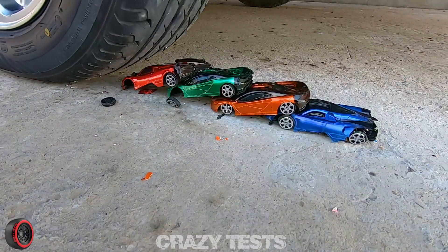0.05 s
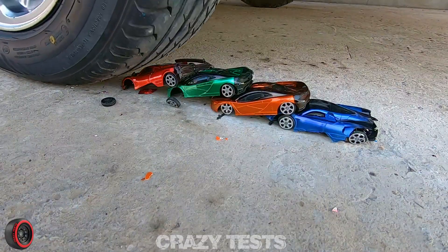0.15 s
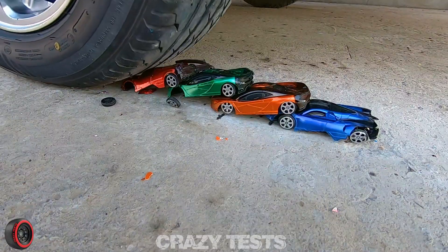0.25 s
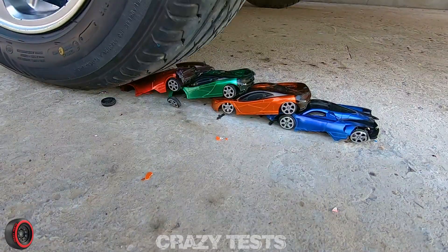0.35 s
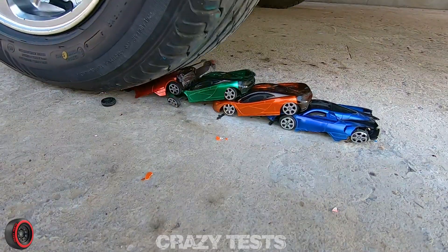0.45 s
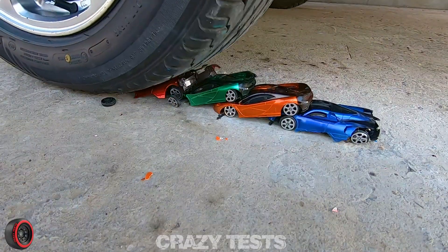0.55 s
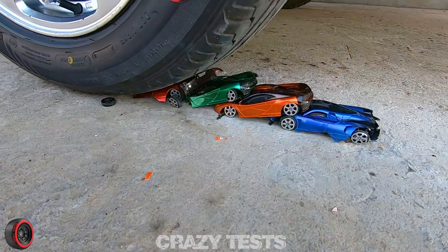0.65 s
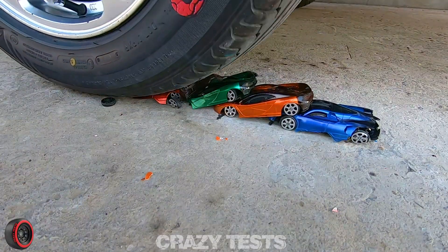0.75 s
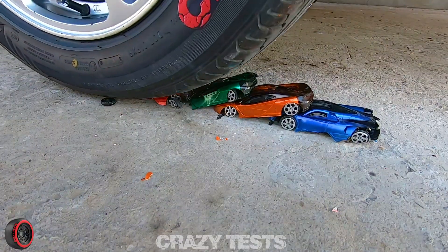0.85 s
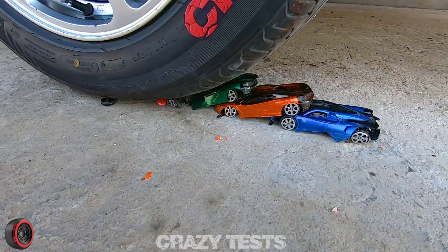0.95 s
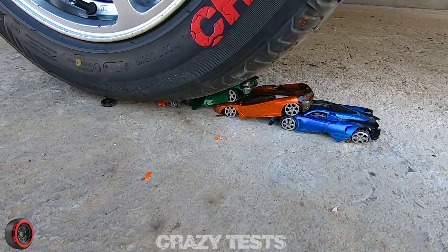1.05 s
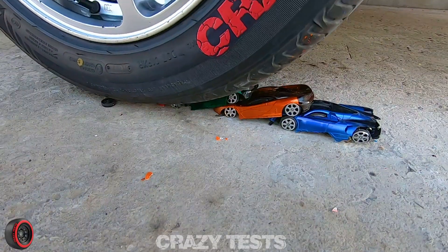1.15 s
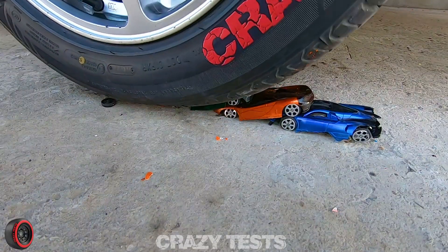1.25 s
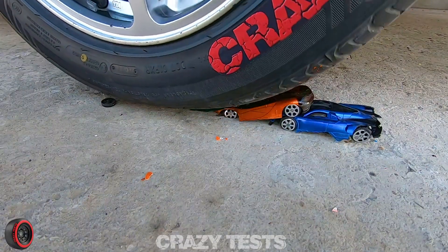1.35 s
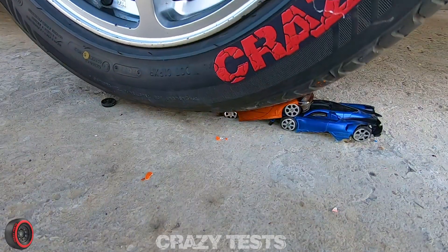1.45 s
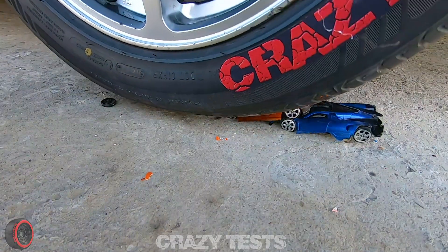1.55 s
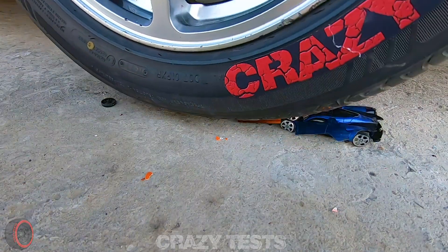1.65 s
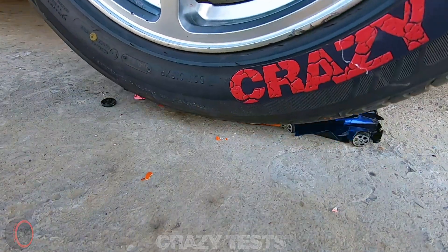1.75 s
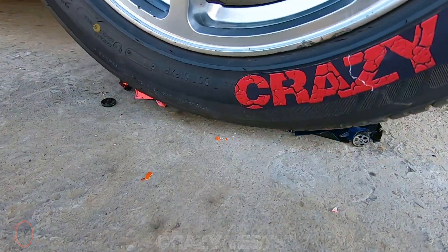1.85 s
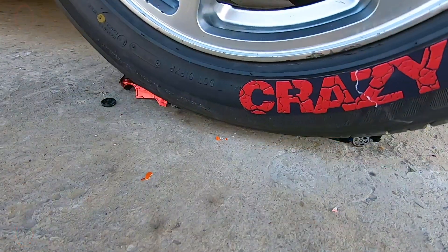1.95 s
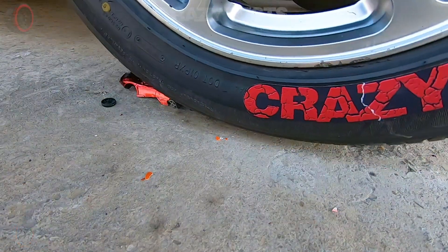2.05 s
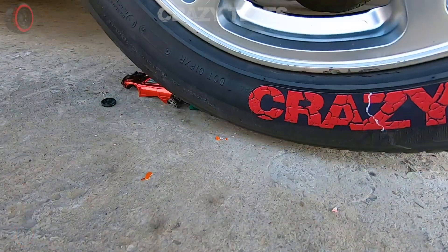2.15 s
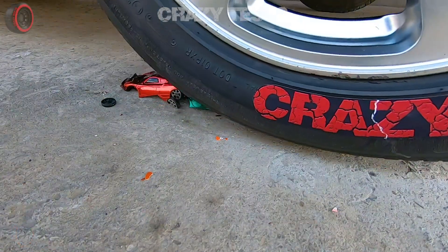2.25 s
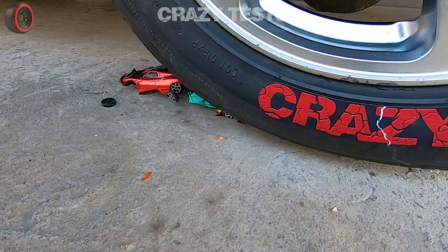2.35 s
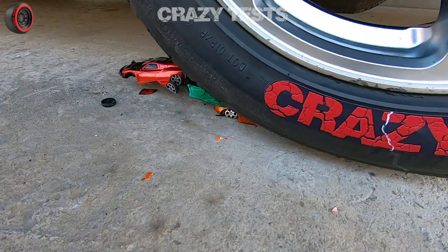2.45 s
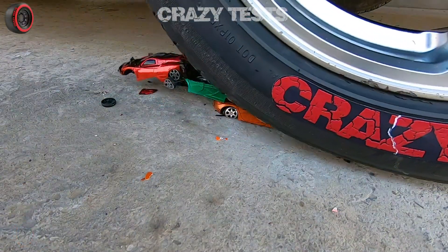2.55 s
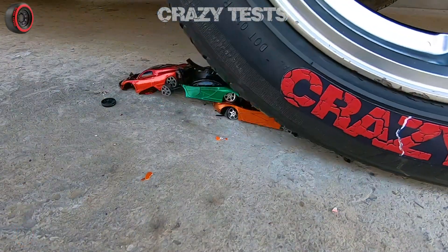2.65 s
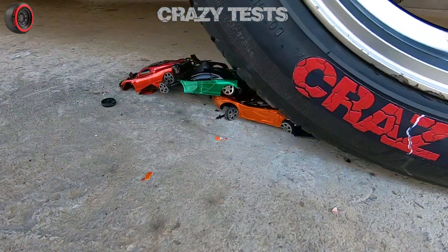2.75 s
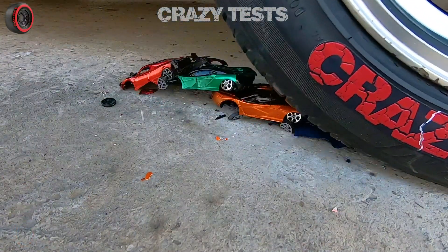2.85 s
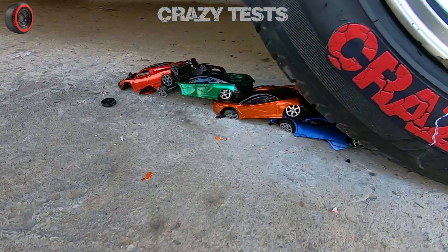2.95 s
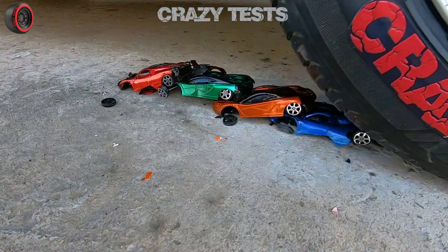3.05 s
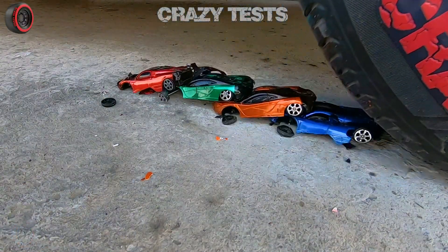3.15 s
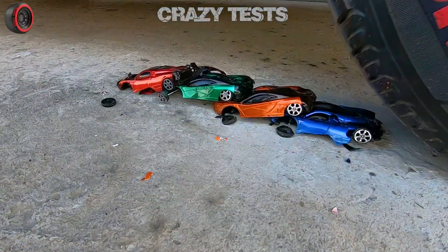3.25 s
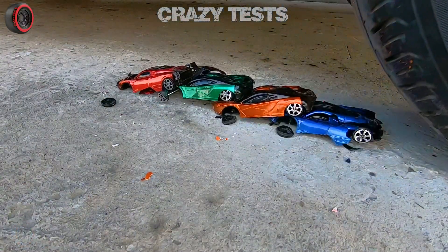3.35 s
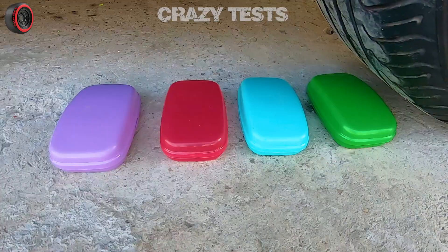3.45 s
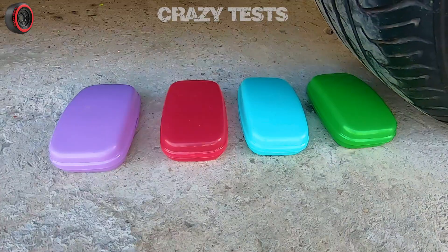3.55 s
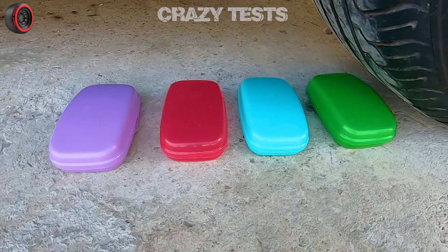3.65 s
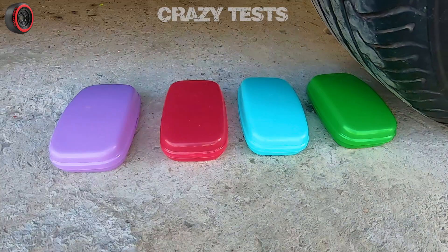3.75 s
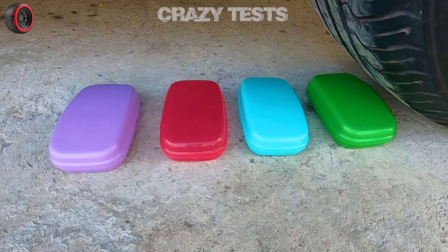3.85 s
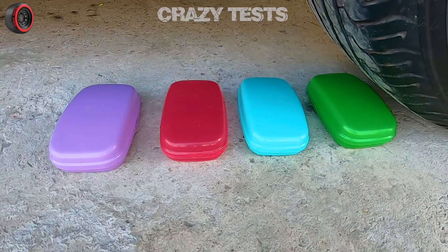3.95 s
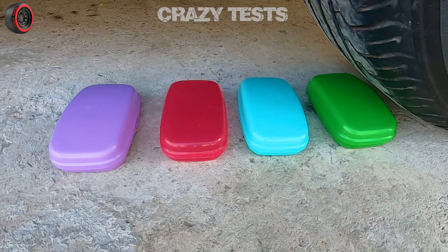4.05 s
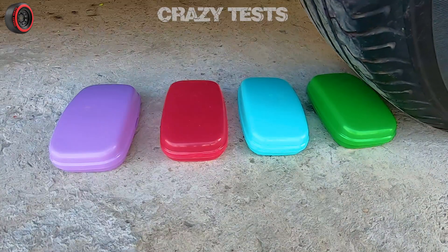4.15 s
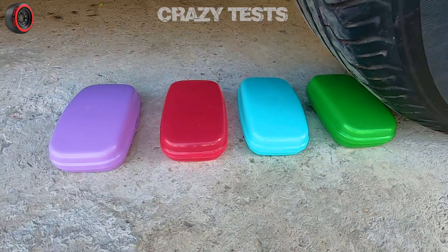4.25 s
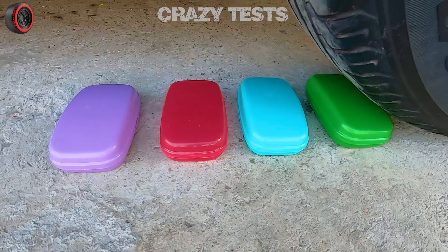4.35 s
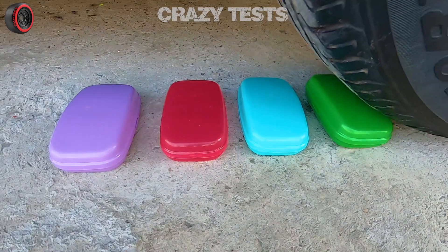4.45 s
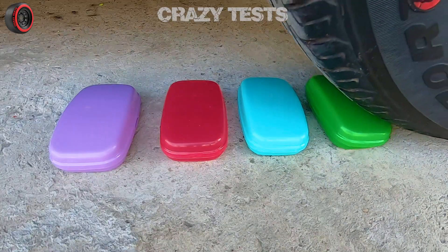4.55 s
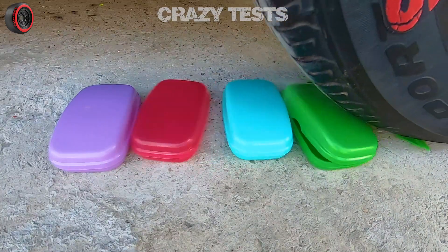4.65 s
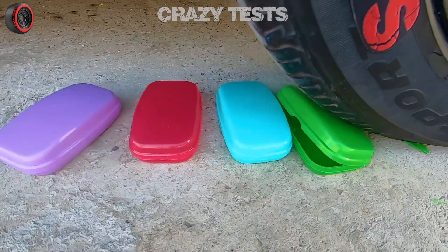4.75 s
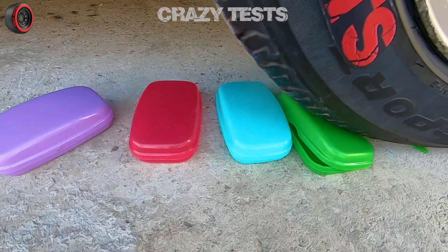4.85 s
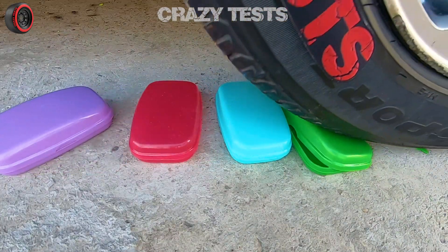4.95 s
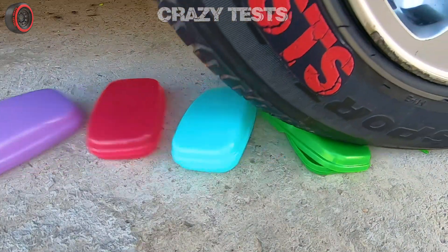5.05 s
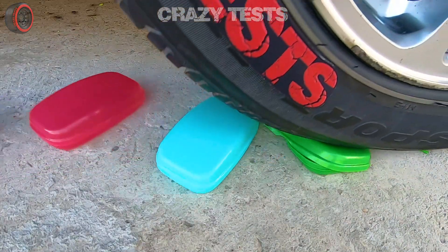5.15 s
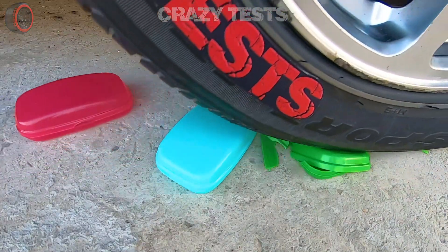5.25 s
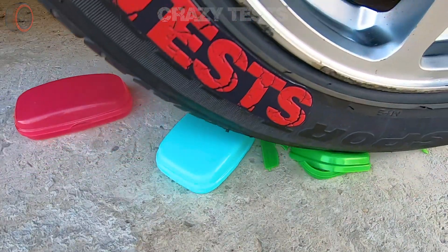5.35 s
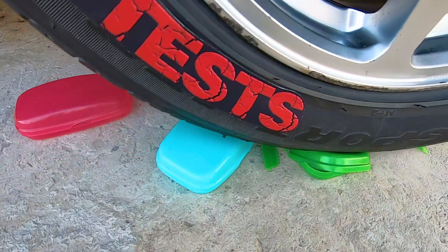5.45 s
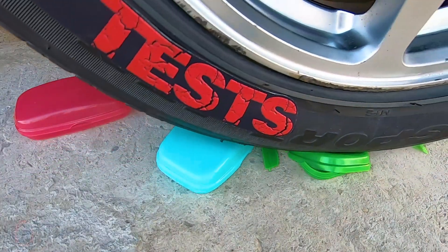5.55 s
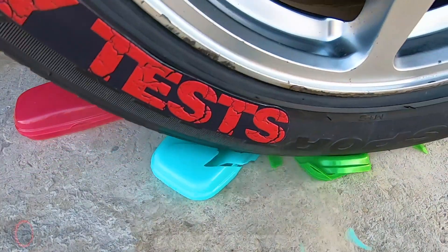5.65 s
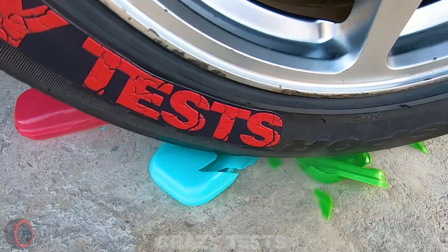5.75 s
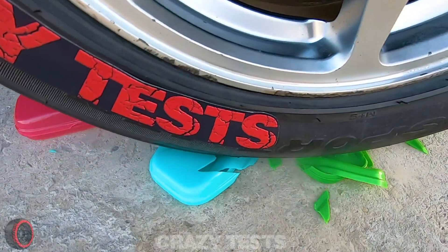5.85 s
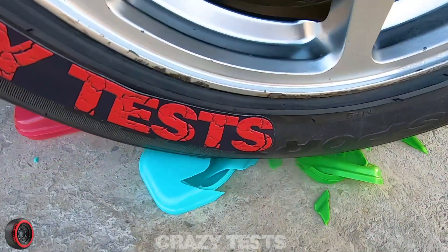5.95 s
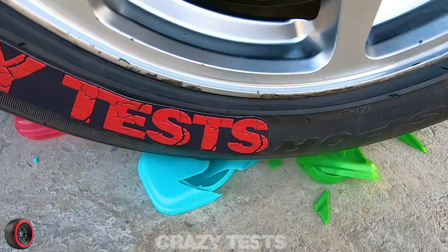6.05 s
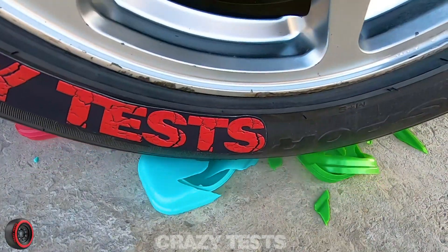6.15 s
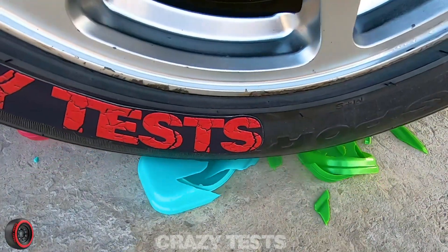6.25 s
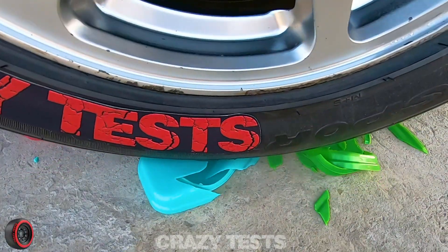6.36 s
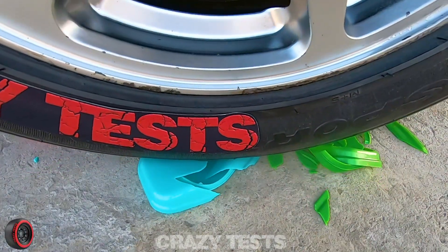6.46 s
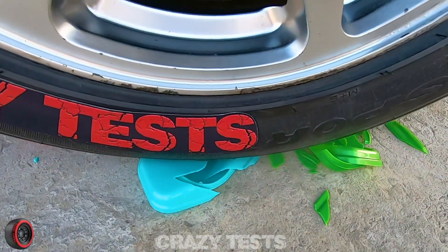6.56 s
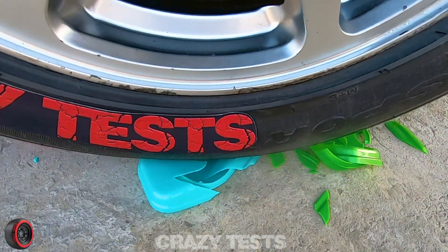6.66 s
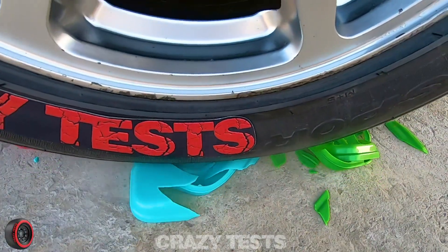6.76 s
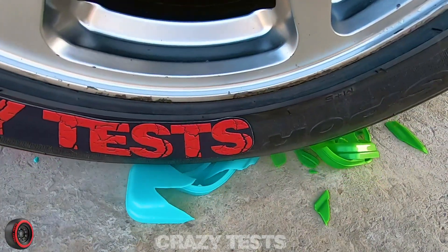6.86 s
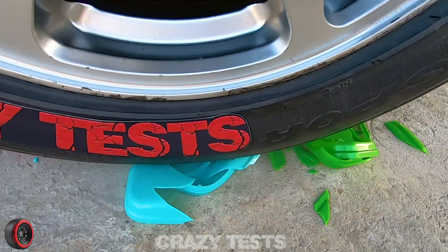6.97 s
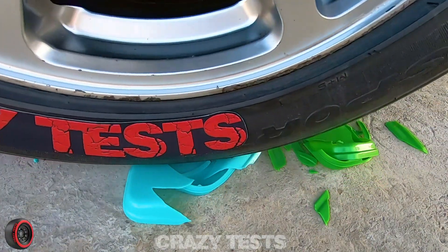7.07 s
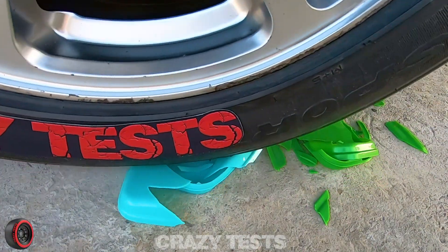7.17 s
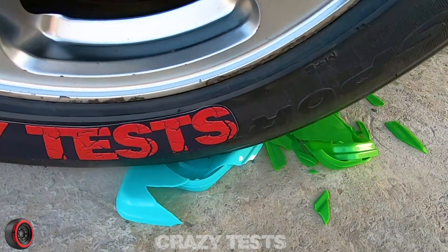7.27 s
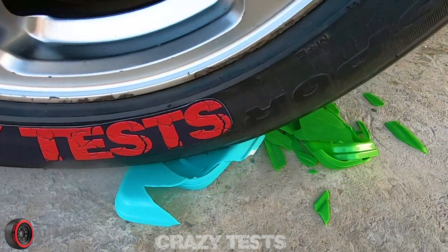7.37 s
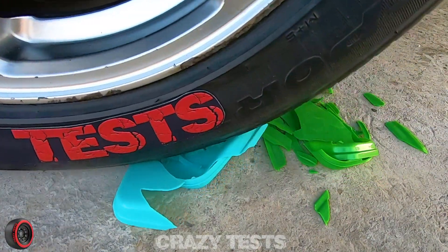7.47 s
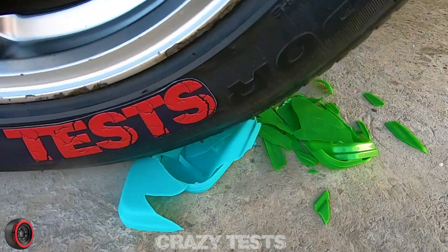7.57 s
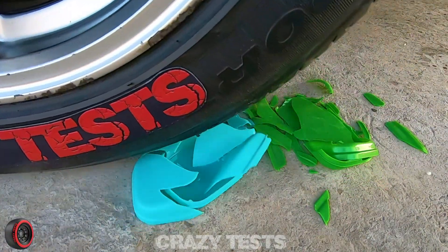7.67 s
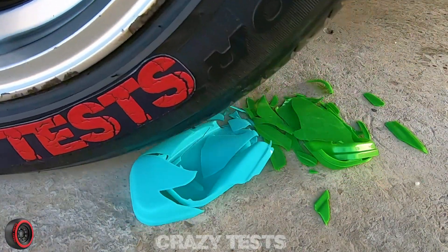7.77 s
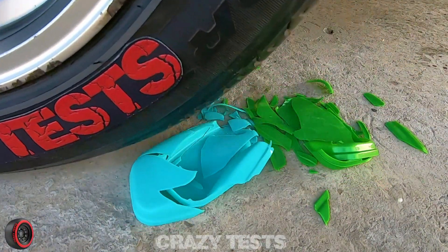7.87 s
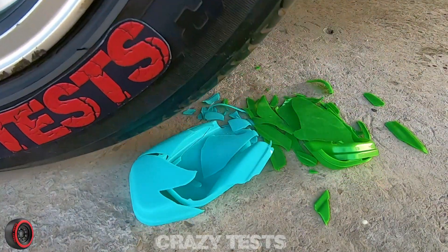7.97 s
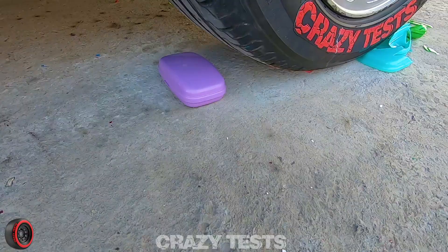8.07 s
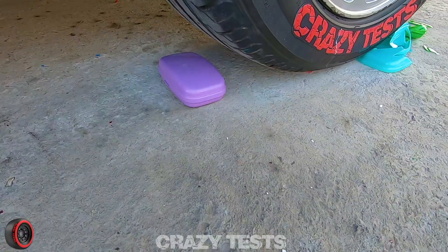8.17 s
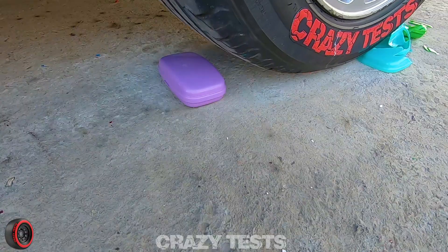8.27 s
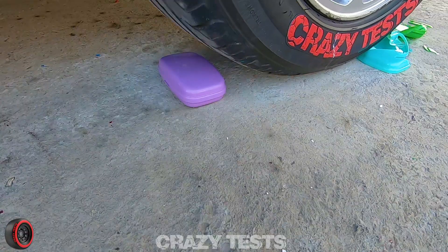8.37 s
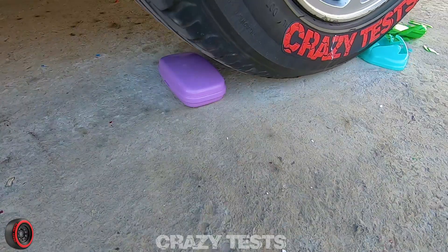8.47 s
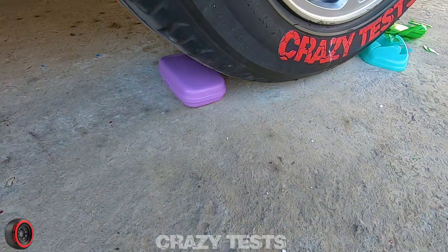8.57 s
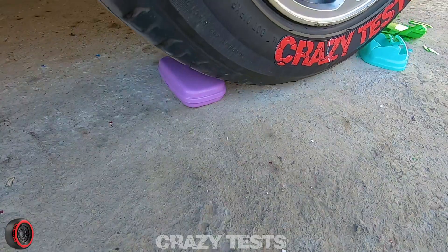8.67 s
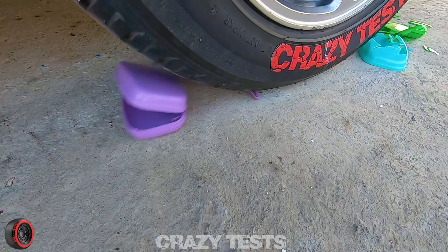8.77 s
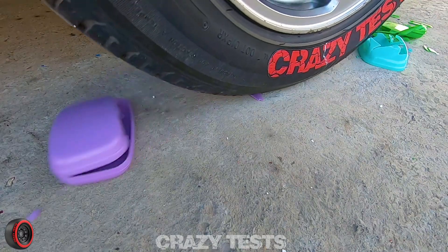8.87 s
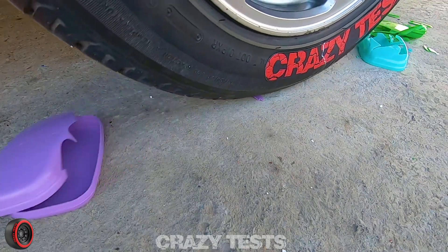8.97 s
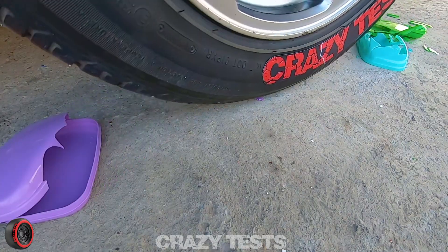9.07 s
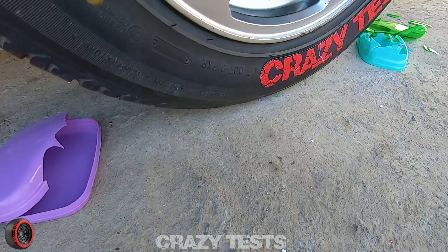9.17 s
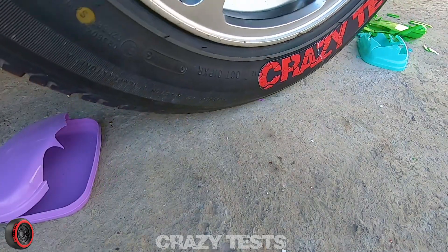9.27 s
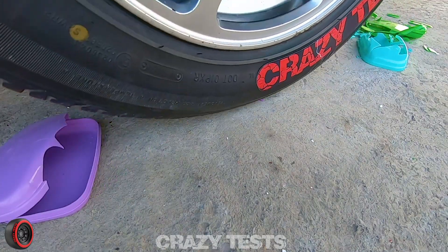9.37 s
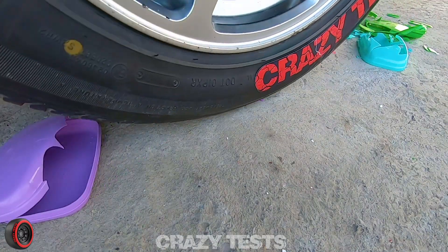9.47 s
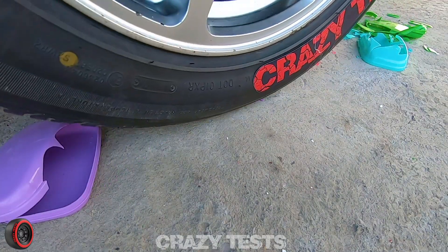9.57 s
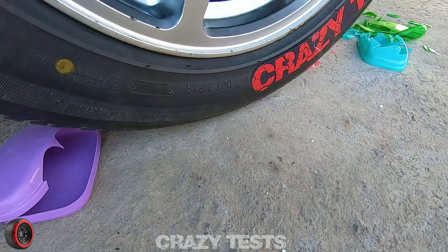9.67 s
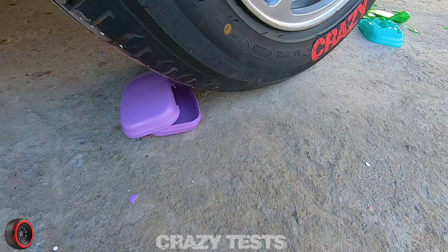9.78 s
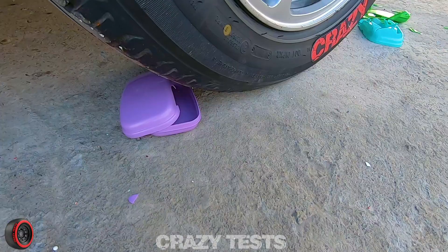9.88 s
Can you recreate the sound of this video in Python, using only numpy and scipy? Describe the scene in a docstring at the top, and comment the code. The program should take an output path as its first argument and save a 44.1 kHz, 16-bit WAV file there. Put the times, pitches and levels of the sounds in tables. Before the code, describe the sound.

A close ground-level microphone picks up a low, throbbing engine and a tyre rolling over concrete. From about 0.4 s small plastic toy cars break in a rapid, uneven run of bright snaps and hollow cracks, with gritty grinding swelling until about 2.7 s. A few shards tick near 3 s, then mostly engine hum remains. At 4.3 s a plastic box creaks and knocks; a loud burst follows around 4.7 s. Heavy cracks cluster from 5.1 to 6 s, overloading the input with thumps of air and a hollow tyre ring. Tiny ticks fade until another big burst at 6.8 s, more cracks from 7.2 s and a bang at 7.7 s. The engine revs briefly near 8.2 s and slows. Creaks lead to a last strong crack cluster at 8.8 s, then faint ticks and a low engine thud near 9.8 s.

```python
"""A slow engine idles behind a tyre that grinds grit: firing tones, noise bands, rung crumbs, dull rubbing.
From 0.4 s brittle plastic shells snap as short rough noise that rings them; bent shards tick. From 0.8 s boxes
burst with a push of air, the loud ones overloading the input, and the tyre's air hums. From 4.3 s loaded shells
creak in slips and knock as two fading tones. Near 8.2 s the engine revs once, then slows under the last cracks.
"""
import sys
import numpy as np
from scipy import signal
from scipy.io import wavfile
from scipy.ndimage import uniform_filter1d

SR = 44100
rng = np.random.default_rng(int(sys.argv[2]) if len(sys.argv) > 2 else 0)


def store_pcm(level_fs):
    """Save levels as 16-bit WAV."""
    pcm = np.round(np.clip(level_fs, -1, 1) * 32767).astype(np.int16)
    wavfile.write(sys.argv[1], SR, np.atleast_2d(pcm).T)


N = 437472


def from_db(db):
    """Decibels to an amplitude factor."""
    return 10 ** (np.asarray(db) / 20)


def rms_one(x):
    """Scale a sound to an average (rms) level of 1."""
    return x / np.sqrt(np.mean(x ** 2) + 1e-20)


def at_hz(points, hz):
    """Read a spectrum table in dB on a log-frequency axis."""
    table = np.array(points)
    return np.interp(np.log(hz), np.log(table[:, 0]), table[:, 1])


def in_time(rows):
    """Turn the columns of a timed table into curves, one value a sample."""
    s, *columns = np.transpose(rows)
    return [np.interp(np.arange(N) / SR, s, column) for column in columns]


def low_pass(x, order, hz):
    """Keep what lies below a pitch."""
    return signal.sosfilt(signal.butter(order, hz, fs=SR, output="sos"), x)


def band(x, low_hz, high_hz):
    """Keep what lies between two pitches, with gentle second-order slopes."""
    return signal.sosfilt(signal.butter(2, [low_hz, high_hz], "band", fs=SR, output="sos"), x)


def resonate(x, hz, width_hz):
    """Ring one resonance; its gain at the top is 1."""
    r = np.exp(-np.pi * width_hz / SR)
    feedback = [1, -2 * r * np.cos(2 * np.pi * hz / SR), r * r]
    return signal.lfilter([(1 - r * r) / 2, 0, (r * r - 1) / 2], feedback, x)


def drift(rate):
    """Random wander: straight lines between normal random values, `rate` values a second."""
    steps = rng.standard_normal(round(N / SR * 60) + 2)
    return np.interp(np.arange(N) / SR * rate, np.arange(len(steps)), steps)


# Engine speed, with one rev: time_s, firing_hz
ENGINE_SPEED = [(0, 22.4), (.41, 27.94), (1.4, 21.75), (2.35, 30.87), (2.8, 27.7), (4.3, 25.08),
                (7.7, 27.77), (8.2, 45.5), (8.32, 44.44), (8.62, 36.06), (8.82, 28.6), (9.4, 26.48),
                (9.92, 26.36)]
# Engine levels at the microphone, sinking after the loudest bursts: time_s, thud_db, exhaust_db, rush_db
ENGINE_LEVELS = [(0, -23.5, -29, -57), (.6, -19.5, -32.5, -42), (1.2, -32.5, -61, -64),
                 (1.9, -34.5, -40, -50), (2.7, -31.5, -45.5, -49), (3.4, -32.5, -48.5, -49.5),
                 (4.4, -34, -48, -51.5), (4.62, -35, -49, -50), (4.83, -49, -66.5, -56.5),
                 (6.1, -47.5, -57.5, -67), (6.7, -30, -53, -62), (7.04, -45, -56, -61.5),
                 (7.6, -27.5, -48, -61.5), (7.8, -33.5, -40.5, -47.5), (8.06, -33.5, -23, -40),
                 (8.45, -22.5, -30.5, -35), (8.76, -23.5, -44.5, -43), (8.92, -44, -70, -67.5),
                 (9.35, -55, -60.5, -64), (9.6, -34.5, -42, -59.5), (9.78, -12.5, -39.5, -53.5),
                 (9.92, -24, -34.5, -51)]
# Colour the exhaust pipe gives to the multiples of the firing rate: pitch_hz, level_db (before a slow waver)
EXHAUST_COLOUR = [(45, -8.5), (80, -1), (108, -10), (135, 0), (158, 3), (185, -17), (215, -25.5),
                  (270, -14.5), (330, -33.5), (400, -27.5), (600, -32.5)]


def engine():
    """The firing rate is a near sine, its multiples coloured by the exhaust pipe, over a turbulent rumble."""
    firing_hz, = in_time(ENGINE_SPEED)
    thud_db, exhaust_db, rush_db = in_time(ENGINE_LEVELS)
    phase = 2 * np.pi * np.cumsum(firing_hz) / SR
    out = from_db(thud_db) * np.sqrt(2) * np.sin(phase)
    # Cylinders differ, so half the firing rate is heard too
    out += from_db(exhaust_db - 6.5 + 4 * drift(9.5)) * np.sin(phase / 2)
    rumble = rms_one(band(rng.standard_normal(N), 50, 190))
    out += from_db(exhaust_db - 13) * rumble
    for k in range(2, 23):
        waver_db, slip = 2.5 * drift(8), .4 * drift(6)
        tone_db = exhaust_db + at_hz(EXHAUST_COLOUR, k * firing_hz) + waver_db
        out += from_db(tone_db) * np.sin(k * phase + 0.92 * k + slip)
    return out, phase, rush_db


# Colour of the fan and intake noise; only the shape matters: pitch_hz, density_db (per Hz)
RUSH_COLOUR = [(180, -1), (209, -10), (324, -8), (604, -8), (1370, -13), (1590, -17), (5080, -32.5),
               (9000, -52.5)]


def rush(phase, level_db):
    """Fan and intake noise in half-octave bands throbs slightly with each firing."""
    edges_hz = 180 * 2 ** np.arange(0, 6, .5)
    white = rng.standard_normal((2, N))   # neighbouring bands take different noise
    out = 0
    for k, (low, high) in enumerate(zip(edges_hz, edges_hz[1:])):
        band_db = at_hz(RUSH_COLOUR, np.sqrt(low * high)) + 0.85 * drift(25)
        out = out + from_db(band_db) * band(white[k % 2], low, high)
    out /= np.sqrt(np.mean(band(out, 400, 2000) ** 2))   # the level is set by the middle pitches
    return from_db(level_db) * out * (1 + 0.11 * np.sin(phase))


# Thin tones of the engine bay, steady in pitch: pitch_hz, level_db (relative to the rush)
WHINE_TONES = [(5200, -26), (10400, -44.5)]


def whine(rush_db):
    """Thin sine tones follow the level of the rush."""
    t = np.arange(N) / SR
    return sum(from_db(rush_db + db) * np.sqrt(2) * np.sin(2 * np.pi * hz * t) for hz, db in WHINE_TONES)


CRUSH_RISE_DB_S, CRUSH_FALL_DB_S = 66, 44.5   # swell before and fade after each crush
SAND_DB = -75                                 # bare sand between crushes
# A toy or a box is ground flat under the tread: full_weight_s, grit_db
CRUSH_TIMES = [(.72, -34), (1.35, -45.5), (2.0, -39), (2.7, -39), (5.172, -54), (5.519, -60), (7.29, -50),
               (7.641, -53.5), (8.501, -54.5)]


def crushing():
    """Level of the grit in dB swells towards each crush and fades after it, over bare sand."""
    t = np.arange(N) / SR
    power = from_db(SAND_DB) ** 2
    for s, db in CRUSH_TIMES:
        drop_db = np.maximum(CRUSH_RISE_DB_S * (s - t), CRUSH_FALL_DB_S * (t - s))
        power = power + from_db(db - drop_db) ** 2
    return 10 * np.log10(power)


def grit(level_db):
    """Crumbs of plastic and sand grind under the tread in fits, with sparse clumps of short bright ticks."""
    fits = from_db(7 * drift(18))
    sizes = from_db(4 * np.minimum(rng.exponential(1, N), 3.5)) * rng.choice([-1, 1], N)
    ticks = sizes * (rng.random(N) < 200 * fits ** 1.5 / SR)
    ticks += .035 * rng.standard_normal(N) * fits
    dealt = rng.integers(0, 8, N)   # each sample goes to one of eight resonances
    pitches_hz = np.geomspace(1300, 10000, 8)
    rings = sum(resonate(ticks * (dealt == k), hz, 0.22 * hz) for k, hz in enumerate(pitches_hz))
    return from_db(level_db) * rms_one(low_pass(rings, 4, 12000))


GRIND_DB, GRIND_RING_DB = -2, 2.5   # dull grinding relative to grit, hollow ring inside it
GRIND_HZ, GRIND_WIDTH_HZ = 850, 77


def grind(grit_db):
    """Shells buckle under the tread: a dull lumpy rustle with a hollow ring, below the grit."""
    rub = rng.standard_normal(N) * from_db(4.5 * drift(40))
    hollow = from_db(GRIND_RING_DB) * resonate(rub, GRIND_HZ, GRIND_WIDTH_HZ)
    return from_db(grit_db + GRIND_DB) * rms_one(band(rub, 690, 5400) + hollow)


BURST_S, BURST_GROWTH = 0.0026, 0.35   # crack length at level 0 dB, and how it follows the level
TAIL_DB = -16                          # rattle and echo under the car
TAIL_T60_S = 0.14, 0.1, 0.016          # time to fade by 60 dB: low, middle, top
# Cracking shells: start_s, level_db, shell_pitch_hz, low_body_db, top_db (the last two relative to level_db)
SNAP_EVENTS = [(0.3709, -18, 4270, -15.5, -11), (0.404, -8.5, 3200, -27.5, -7),
               (0.523, -13.5, 2300, -22, -16), (0.549, -9, 3300, 10.5, -12), (0.553, 0.5, 4300, -48.5, -4),
               (0.564, 4.5, 4380, -46, 0.5), (0.636, -6.5, 2883, -42, 2.5), (0.7093, -9, 2545, -3.5, -14),
               (0.7303, -2.5, 2440, 0.5, -10), (0.7347, 1.5, 980, -17, -1), (0.7476, -3.5, 2746, -1, 8.5),
               (0.8043, 5.5, 2240, -39.5, -32.5), (0.8363, -5, 3506, -32, 4), (0.8515, -7.5, 3680, -24, 0),
               (0.88, -9.5, 1530, -13.5, -14.5), (0.907, 0.5, 3385, -4.5, 6.5),
               (0.9829, -11.5, 5000, -28.5, 13.5), (1.0705, 0.5, 3300, 2.5, 3.5),
               (1.1198, -13, 4060, -8, -2), (1.1725, -1, 3560, -46, -7), (1.1799, -6, 865, -9, 5.5),
               (1.2161, 2.5, 850, -7.5, -6), (1.255, -15, 1750, -35, -25), (1.3054, -6.5, 2370, -15, 3.5),
               (1.3528, -1, 810, -15.5, 1.5), (1.4702, -8.5, 1380, -17, -26), (1.582, 5.5, 582, -16, 5.5),
               (1.694, -13.5, 4220, -7, -3), (1.7147, -2.5, 2276, -3.5, 7.5), (1.8253, -1, 1220, -1, 6),
               (1.8942, -4, 5160, -6.5, 0), (1.9057, 4.5, 770, -7, 3), (1.9561, -9, 810, -4, -3),
               (1.972, 0, 4770, -2.5, -8), (2.0538, -0.5, 755, -10.5, 3.5), (2.0919, 1.5, 810, -32.5, -41),
               (2.1154, 0.5, 790, -20, 4.5), (2.252, -15.5, 2480, -37, -7), (2.343, -12.5, 5070, -12, -7),
               (2.393, -9, 3240, -38.5, -22), (2.4456, -15, 2512, -14, -45), (2.4616, -10.5, 2550, -5, 9.5),
               (2.589, -8, 4030, -7, 3.5), (2.6523, -3, 1500, -10.5, -13), (2.6676, 4.5, 850, -5, -9),
               (2.7169, -7.5, 2980, -31, 12), (4.3792, -24, 2420, -18, -40), (4.618, 3.5, 753, 6, -13),
               (4.6269, -2, 644.7, 14, -1), (4.6843, 9.5, 3370, -43, -10), (4.7438, -22.5, 484, 17, 0),
               (5.0278, -14.5, 3470, -14, 11.5), (5.0602, -16, 2060, -4, 10.5),
               (5.0783, -1.5, 976, -21, -8.5), (5.087, 6.5, 770, -5.5, -18.5), (5.1069, 7, 1150, 4.5, 3),
               (5.19, -9, 627, 1, -20.5), (5.2493, 8, 1130, 0.5, -3), (5.33, 7, 1550, -38, 7),
               (5.6637, 13, 1184, -1, 2.5), (5.7321, -5.5, 1190, -4, 4), (5.7636, 2.5, 1560, -0.5, 6.5),
               (5.7954, 3, 1055, -7, -1), (5.829, 3, 1390, -5, -35), (5.9684, 2.5, 1450, -5.5, 5.5),
               (6.0355, -14.5, 4540, -22, 3), (6.5074, -17.5, 1080, -21, -44),
               (6.7804, 14, 1334, -3, -16.5), (6.8556, -5.5, 2420, 3, 4), (7.0763, -13.5, 4780, -30, -28),
               (7.1305, -15, 4570, -36.5, -30), (7.2029, 9, 1120, -2, -12), (7.3194, -7, 1133, -7, -28),
               (7.337, -5, 1920, -33, -28), (7.3834, 3, 1070, -4, -16), (7.4737, -1.5, 2200, -54.5, -12),
               (7.5284, -13.5, 5230, -9, -26), (7.539, -13.5, 2770, -10.5, -12), (7.619, -15, 3940, -23, 0),
               (7.6965, 12.5, 440, -2, -9), (7.8069, -13.5, 1520, -14, -36), (8.4975, -17, 2410, -18, -25),
               (8.59, -16, 1008, 3, 6), (8.777, 0.5, 873, -4, -3.5), (8.782, 1, 800, 4, -9),
               (8.7946, 9, 1155, -2, -5.5), (9.221, -12.5, 626.1, -11, -3)]


def snaps():
    """A crack runs for a few ms as dense uneven fractures, rings the shell at its pitch and leaves a rattle."""
    size = round(.16 * SR)
    out, t = np.zeros(N + size), np.arange(size) / SR
    noise = rng.standard_normal((len(SNAP_EVENTS), 3, size))
    for (s, level_db, hz, low_db, top_db), (fine, lumps, luck) in zip(SNAP_EVENTS, noise):
        length_s = BURST_S * from_db(BURST_GROWTH * level_db)
        running = np.exp(-(t / length_s) ** 2.0) * (1 - np.exp(-t / 0.00024))
        crack = fine * from_db(6.12 * lumps) / 2 * running
        splinters = 11 * fine * (luck > 2.85)   # loose bits tick as they settle
        uneven_db = 20.0 * uniform_filter1d(lumps, size=60) + 54 * uniform_filter1d(luck, size=300)
        rattle = from_db(TAIL_DB) * (fine * from_db(uneven_db) + splinters)
        low, mid, top = [crack + rattle * from_db(-60 * t / t60) for t60 in TAIL_T60_S]
        shell = resonate(crack + 0.89 * (mid - crack), hz, 0.2 * hz)
        # Pieces ring briefly at pitches around the shell's own
        shell += .5 * sum(resonate(crack, hz * from_db(7 * bend), 130) for bend in np.tanh(luck[:3]))
        sound = from_db(low_db) * band(low, 67, 1300) * 2
        sound += band(mid, np.clip(0.35 * hz, 500, 2500), 6000)
        sound += from_db(top_db) * band(top, 6800, 9680)
        sound += from_db(10.0) * shell
        at = round(s * SR)
        out[at:at + size] += from_db(level_db) * sound
    return out[:N]


SHARD_S, SHARD_TAIL_S = 0.00073, 0.0094   # fade times of the tick and of its weaker tail
SHARD_RING_DB = 12
# Ticking shards: start_s, level_db, pitch_hz
SHARD_TICKS = [(0.68, -8.5, 2480), (0.7954, -16.5, 2200), (1.4083, -27, 5040), (1.633, -20, 2600),
               (1.984, -10, 4500), (2.0245, -18, 4540), (2.176, -20.5, 2180), (2.2164, -17, 5040),
               (2.8595, -18, 3330), (3.0002, -18.5, 3700), (2.9609, -24, 3010), (5.1591, -13, 3125),
               (5.2984, -21, 3960), (5.388, -27, 2930), (5.442, -33.5, 7850), (5.4926, -21.5, 2440),
               (5.5087, -30, 3200), (5.57, -31, 3100), (5.775, -7.5, 3000), (5.839, -4, 3500),
               (6.012, -24, 4500), (6.1447, -32.5, 4850), (6.2031, -25.5, 3120), (6.2333, -31, 3260),
               (6.242, -31.5, 5000), (6.3179, -41, 8000), (6.38, -37, 7550), (6.4541, -32, 4450),
               (6.5493, -38, 6560), (6.561, -38, 6430), (6.5908, -43, 7100), (6.6324, -47, 7000),
               (6.6863, -46, 6950), (6.7467, -39.5, 6980), (7.146, -21, 3840), (7.1695, -33, 5000),
               (7.292, -14, 2600), (7.609, -14.5, 4080), (7.6502, -27, 4840), (8.383, -28, 3970),
               (8.4252, -21.5, 2510), (8.537, -19, 2800), (8.6253, -38, 8000), (8.6502, -32, 8030),
               (9.081, -38.5, 2665), (9.3057, -41, 4214), (9.631, -39, 3207)]


def shards():
    """Bent shards tick as they settle: a very short burst of bright noise rings each at its pitch."""
    size = round(.03 * SR)
    out, t = np.zeros(N + size), np.arange(size) / SR
    fade = np.exp(-t / SHARD_S) + 0.29 * np.exp(-t / SHARD_TAIL_S)
    noise = rng.standard_normal((len(SHARD_TICKS), size))
    for (s, level_db, hz), fine in zip(SHARD_TICKS, noise):
        burst = fine * fade
        bright = band(burst, hz / 2, np.clip(2 * hz, 0, 14000))
        tick = band(bright, hz / 2, 14000) + from_db(SHARD_RING_DB) * resonate(burst, hz, 0.2 * hz)
        out[round(s * SR):][:size] += from_db(level_db) * tick / 2
    return out[:N]


PUFF_RISE_S, PUFF_FALL_S, PUFF_LINGER_S = 0.0018, 0.012, 0.1
TYRE_HZ, TYRE_T60_S = 224.5, 0.93   # pitch of the tyre's air ring, time to fade by 60 dB
# Bursts and jolts: start_s, air_puff_db (before the rise and fall shape), tyre_ring_db
JOLT_EVENTS = [(0.809, -10, -36), (1.074, -8, -38.5), (1.583, -16.5, -41.5), (4.684, 13, -30),
               (5.107, 9.5, -30), (5.251, 2.5, -37), (5.333, 12, -34.5), (5.666, 12, -18.5),
               (5.971, -28.5, -34.5), (6.783, 16, -20), (7.204, -6, -28), (7.699, 13, -12),
               (8.797, 14.5, -31.5)]


def jolts():
    """A bursting box sucks the diaphragm one way for a moment; the air inside the tyre rings on."""
    out, t = np.zeros(N), np.arange(N) / SR
    for s, puff_db, ring_db in JOLT_EVENTS:
        after = np.clip(t - s, 0, None)
        fall = 0.5 * np.exp(-after / PUFF_FALL_S) + 0.079 * np.exp(-after / PUFF_LINGER_S)
        out -= from_db(puff_db) * fall * (1 - np.exp(-after / PUFF_RISE_S))
        out += from_db(ring_db - 60 * after / TYRE_T60_S) * np.sin(2 * np.pi * TYRE_HZ * after)
    return out


# Shells slipping under load: start_s, loudest_s, end_s, level_db, slips_per_s (before the uneven pace),
# low_mode_hz, high_mode_hz, high_mode_db (relative to the low mode)
CREAK_EVENTS = [(4.348, 4.39, 4.4, -25, 140, 762, 2410, -9), (4.95, 4.974, 5.5, -39, 230, 826, 2070, -5.5),
                (8.459, 8.517, 8.6, -26, 330, 1490, 2630, 3), (8.885, 8.943, 8.97, -34, 697, 1400, 2380, 0),
                (8.967, 8.98, 9.11, -40.5, 1000, 1360, 2360, -12)]


def creaks():
    """Stick and slip: uneven soft slips in clumps ring two modes of the loaded shell."""
    out, t = np.zeros(N), np.arange(N) / SR
    pace = from_db(3.5 * drift(60))
    sizes = from_db(4 * rng.standard_normal(N)) * rng.choice([-1, 1], N)
    rub = .03 * rng.standard_normal(N) * pace
    dealt, luck = rng.integers(0, 3, N), rng.random(N)
    for start, loudest, end, level_db, per_s, low_hz, high_hz, high_db in CREAK_EVENTS:
        slips = low_pass((luck < per_s * pace / SR) * sizes + rub, 2, 4500)
        load = from_db(np.interp(t, [start, loudest, end], [-19, 0, -24], left=-200, right=-200))
        for hz, mode_db in (low_hz, 0), (high_hz, high_db):
            # Each slip favours one of three nearby pitches
            rings = sum(resonate(slips * from_db(-12 * (dealt != k)), hz * bend, hz / 14)
                        for k, bend in enumerate((.94, 1, 1.06)))
            out += from_db(level_db + mode_db) * load * rms_one(resonate(rings, hz, hz / 2))
    return out


KNOCK_UPPER, KNOCK_UPPER_DB = 1.1, -5.5   # second mode: pitch ratio and level
KNOCK_SWELL_S = .0022
# Soft hollow knocks: start_s, level_db, pitch_hz
KNOCK_EVENTS = [(4.381, -14, 857), (5.047, -17, 850), (5.115, -10, 490), (5.139, -16, 500),
                (5.189, -15, 547), (8.655, -19, 604), (8.911, -29, 1376), (8.923, -24.5, 1520),
                (8.973, -27, 1390)]


def knocks():
    """A loaded shell gives way a little: two modes swell quickly and die, slightly rough."""
    size = round(.04 * SR)
    out, t = np.zeros(N + size), np.arange(size) / SR
    noise = rng.standard_normal((len(KNOCK_EVENTS), size))
    for (s, level_db, hz), fine in zip(KNOCK_EVENTS, noise):
        rough = from_db(15 * uniform_filter1d(fine, size=50))
        swell = t / KNOCK_SWELL_S * np.exp(1 - t / KNOCK_SWELL_S) * rough
        modes = np.sin(2 * np.pi * hz * t)
        modes += from_db(KNOCK_UPPER_DB) * np.sin(2 * np.pi * KNOCK_UPPER * hz * t)
        out[round(s * SR):][:size] += from_db(level_db) * swell * modes
    return out[:N]


def scene():
    """All sources reach one microphone, copied to both channels."""
    hum, phase, rush_db = engine()
    mono = hum + rush(phase, rush_db + 1.5 * drift(33)) + whine(rush_db)
    grit_db = crushing()
    mono += grit(grit_db) + grind(grit_db)
    mono += snaps() + shards() + jolts() + creaks() + knocks()
    return np.stack([mono, mono])


GAIN_KNEE_DB, GAIN_SHARE = -18, 0.26         # ducking starts here, by this share of the excess
GAIN_BACK_DB_S, GAIN_GRAB_S = 40, 0.0091     # fall of the held level, smoothing time of the gain
COUPLING_HZ, CUTOFF_HZ = 1.3, 16500


def record(dry):
    """Gain ducks after loud sound and creeps back, a coupling capacitor lets slow pushes swing back,
    peaks clip flat, the top is cut."""
    t = np.arange(N) / SR
    power = uniform_filter1d(np.clip(dry[0], -1, 1) ** 2, size=200)
    level_db = 10 * np.log10(power + 1e-9)
    # Hold each peak, then let it sink at a steady rate
    held_db = np.maximum.accumulate(level_db + GAIN_BACK_DB_S * t) - GAIN_BACK_DB_S * t
    wanted_db = GAIN_SHARE * np.clip(held_db - GAIN_KNEE_DB, 0, None)
    r = np.exp(-1 / (GAIN_GRAB_S * SR))
    duck_db = signal.lfilter([1 - r], [1, -r], wanted_db)
    coupled = signal.lfilter(*signal.butter(1, COUPLING_HZ, "high", fs=SR), dry * from_db(-duck_db))
    clipped = np.clip(coupled, -.97, .97)
    top_cut = signal.cheby2(8, 30, CUTOFF_HZ, fs=SR, output="sos")
    return np.clip(signal.sosfilt(top_cut, clipped), -1, 1)


dry = scene()
out = record(dry)
store_pcm(out)
```